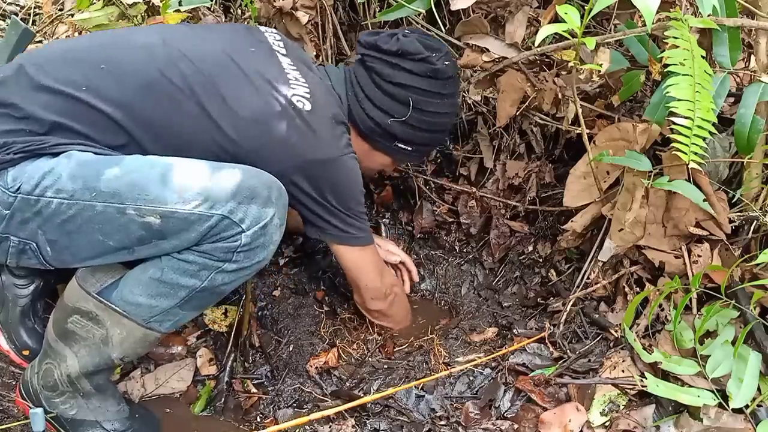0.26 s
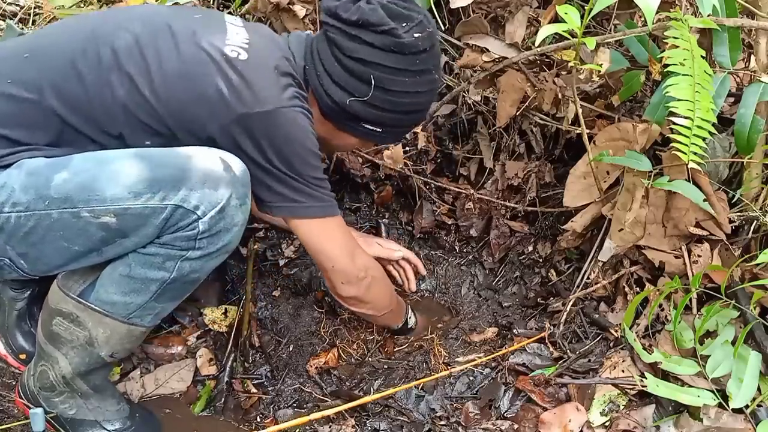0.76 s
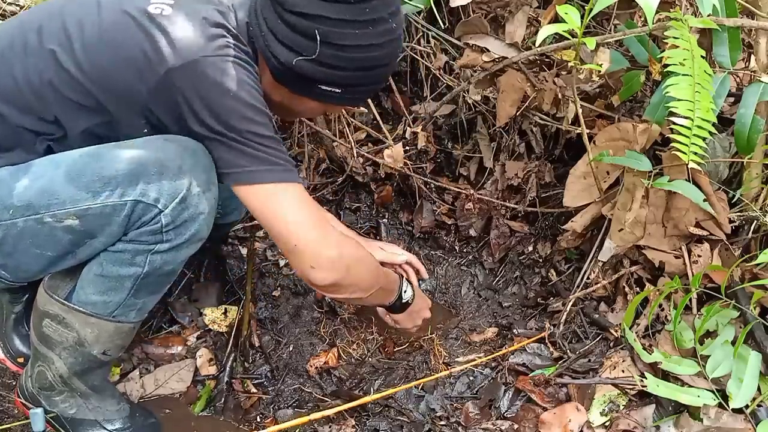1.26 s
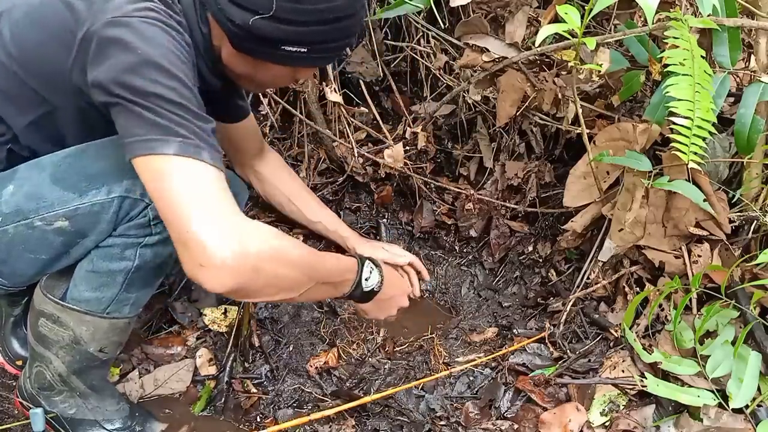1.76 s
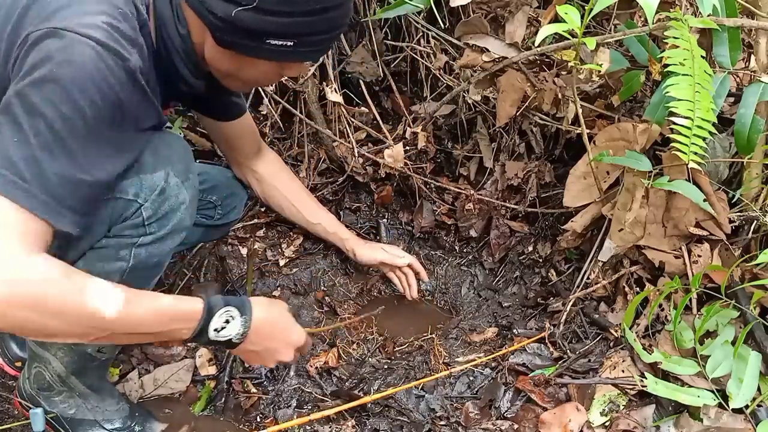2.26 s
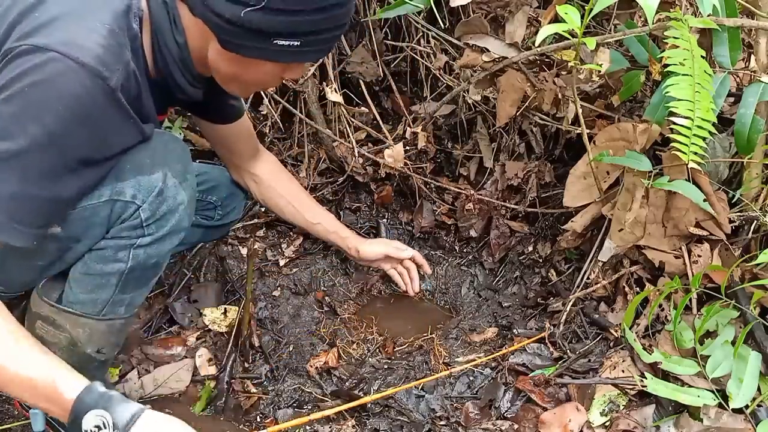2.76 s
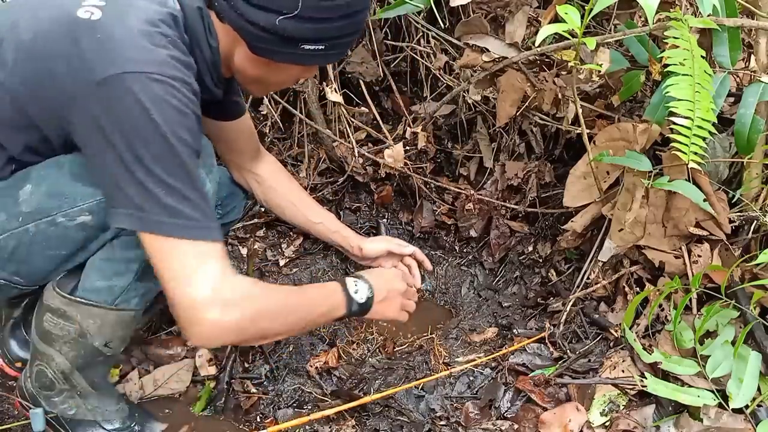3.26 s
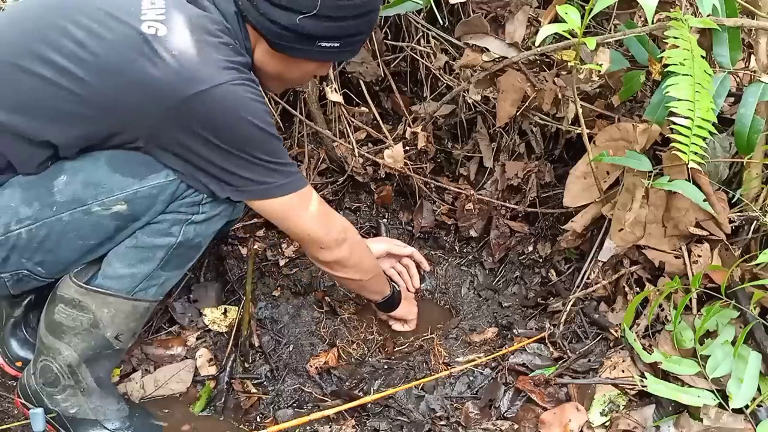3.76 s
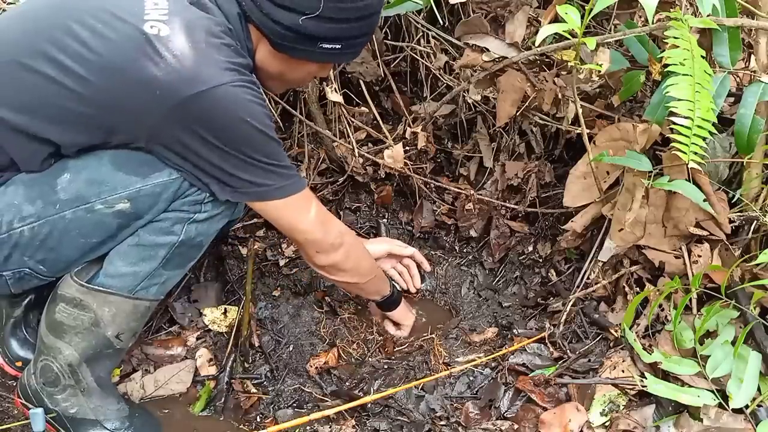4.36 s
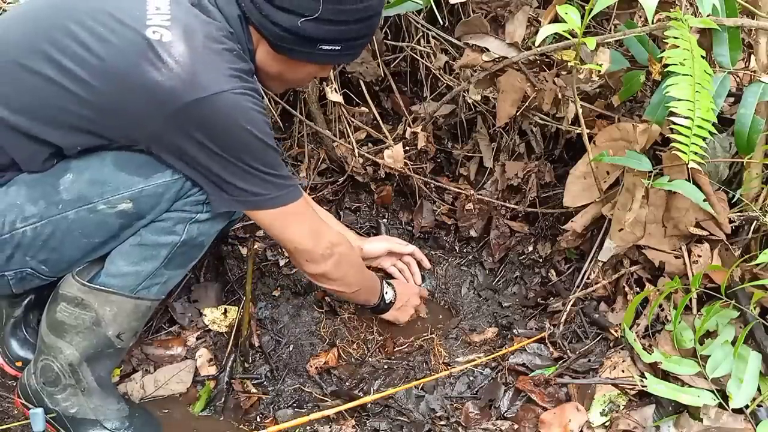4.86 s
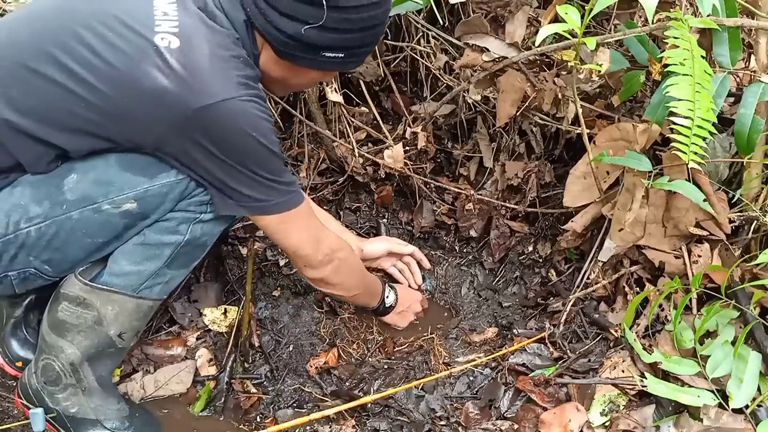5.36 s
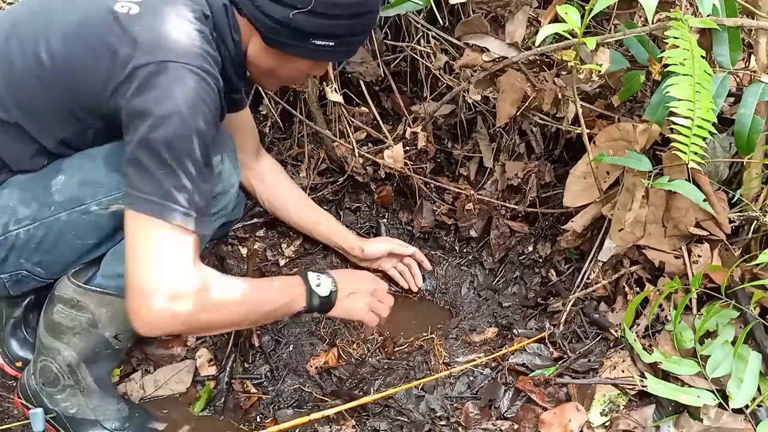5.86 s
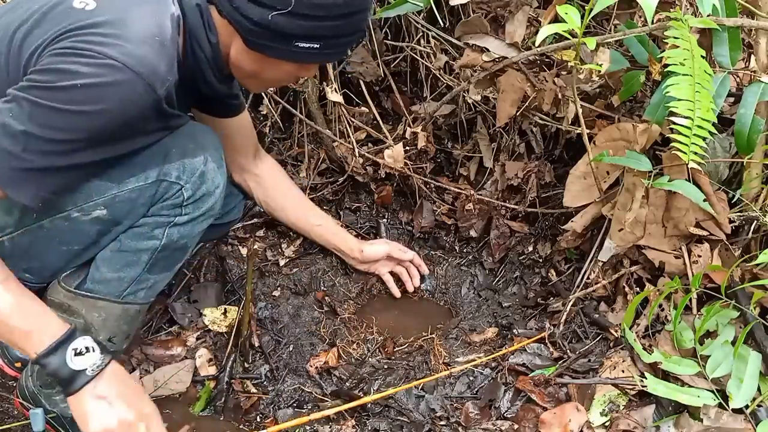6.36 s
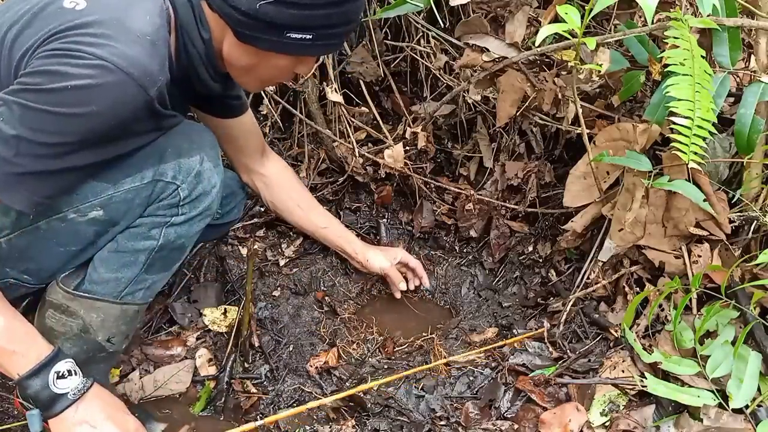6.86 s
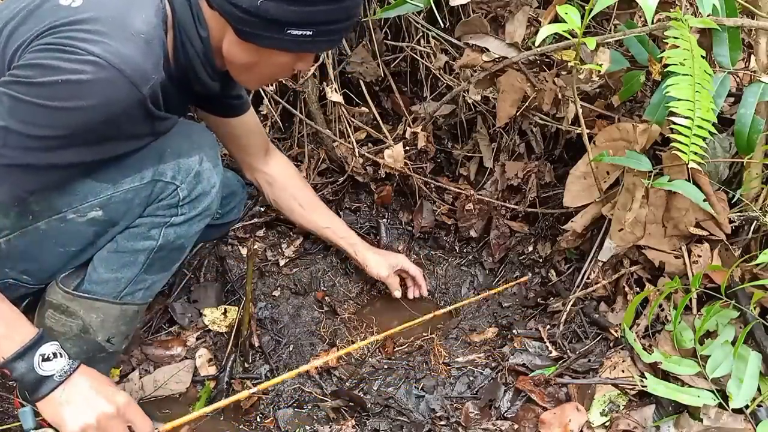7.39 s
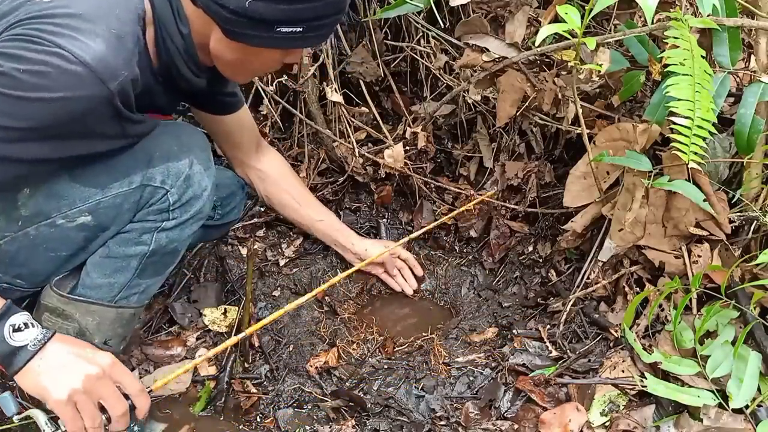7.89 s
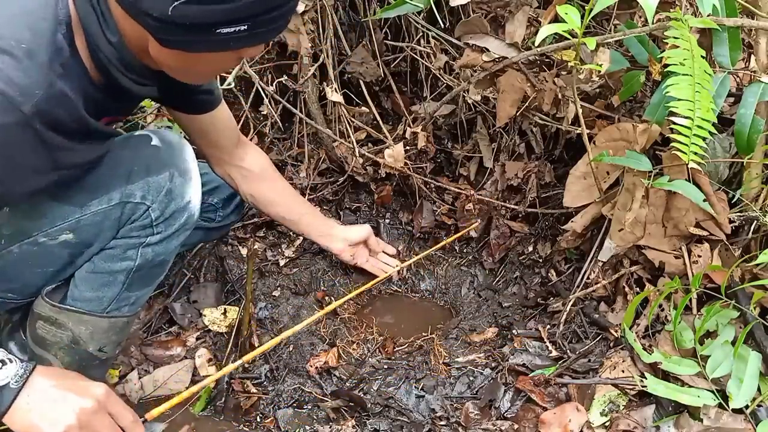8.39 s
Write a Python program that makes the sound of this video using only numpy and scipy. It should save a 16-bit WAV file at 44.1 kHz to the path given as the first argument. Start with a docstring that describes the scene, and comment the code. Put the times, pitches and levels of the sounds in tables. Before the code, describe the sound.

A steady shrill cicada drone fills a swamp forest while two sharp, wet finger flicks pop in a muddy water hole and a bird whistles.

```python
"""Heard: a cicada chorus droning through a swamp forest, two finger flicks in a muddy water hole, bird calls.
Cicadas are click trains rung by their bodies and blurred by echoes; crickets and canopy wind lie beneath.
Each flick is a slap, a few ringing air pockets and crackling spray; twigs tick and wet leaves rustle.
A bird whistles a three-note phrase twice, smeared by echoes from the trunks; a lower call hoots further off."""
import sys
import numpy as np
from scipy import signal
from scipy.fft import rfft, irfft
from scipy.io import wavfile
from scipy.ndimage import uniform_filter1d

SR = 44100
rng = np.random.default_rng(int(sys.argv[2]) if len(sys.argv) > 2 else 0)


def master_out(mix):
    """Clip the mix to full scale and print it as 16-bit PCM to the path in sys.argv[1]."""
    frames = np.transpose(np.atleast_2d(mix))
    ceiling = np.clip(frames, -1, 1)
    pcm = np.round(ceiling * 32767).astype(np.int16)
    wavfile.write(sys.argv[1], SR, pcm)


N = 380583
T = np.arange(N) / SR
BINS_HZ = np.arange(N // 2 + 1) * SR / N

# Levels in the tables are set before echo, pan and output filters.
# Insect body resonance. Each row: frequency in Hz, relative gain in dB.
CICADA_BODY = [(4500, -50), (5600, -35), (6000, -22), (6350, -10), (6650, -1.5), (6980, 1.5), (7250, -1.5),
               (7520, -13), (7850, -24.5), (8300, -31), (8880, -21), (9150, -34.5), (9600, -73.5)]
# Resonance an octave above. Each row: frequency in Hz, relative gain in dB.
CICADA_OVERTONE = [(9500, -45.5), (12300, -17.5), (13300, 7.5), (14400, 17), (15000, 8.5), (15600, 0.5)]
# Stereo lean of the cicadas. Each row: frequency in Hz, left minus right in dB.
CICADA_SIDE = [(5800, 2.5), (6600, -0.5), (7100, 4), (7400, -2.5), (9000, 1), (14000, -5.5)]
# Trills of a lone cricket. Each row: start in seconds, length in seconds, pitch in Hz, level in dB.
CRICKET_TRILLS = [(1.0, 1.9, 5200, -80), (2.88, .92, 5430, -63.5)]
# Spectrum of the canopy murmur. Each row: frequency in Hz, relative gain in dB.
FOREST_AIR = [(15, -56), (25, -20.5), (60, -5), (81, -1.5), (285, -5), (403, -6), (559, -5), (809, -6.5),
              (1120, -9), (2400, -8.5), (2730, -8.5), (4500, -25.5), (5850, -48.5), (9900, -120)]
# Likeness of the two ears. Each row: frequency in Hz, likeness from 0 to 1.
AIR_LIKENESS = [(60, 0.2), (290, 0.2), (700, 0)]
# Stereo lean of the air. Each row: frequency in Hz, left minus right in dB.
AIR_SIDE = [(100, 7.1), (380, 1.4), (1300, 1)]
# Clearer twigs, stalks and drops. Each row: start in seconds, peak in dB, ring in Hz, width in Hz,
# decay (t60) of the exciting crack in seconds.
TICKS = [(1.028, -52, 1980, 890, .035), (1.098, -52.5, 2420, 900, .05), (1.276, -50, 3000, 895, .04),
         (1.390, -53, 3460, 302, .04), (1.414, -45, 3150, 700, .03), (1.491, -49, 4320, 800, .025),
         (2.037, -47.5, 3070, 700, .024), (2.227, -52.5, 2900, 1400, .05), (2.543, -43.5, 2400, 1500, .018),
         (2.95, -52, 1820, 600, .023), (3.035, -26.5, 1620, 1200, .027), (3.07, -43, 1690, 1800, .03),
         (3.108, -32, 2220, 1800, 0.049), (3.107, -35.5, 476, 223, 0.019), (3.121, -39.5, 1100, 1500, .035),
         (3.161, -32.5, 1410, 1010, .05), (3.172, -28.5, 2400, 2800, .012),
         (3.301, -32.5, 2140, 2380, .028), (4.137, -25, 2003, 900, .014), (5.37, -49.5, 1940, 1200, .025),
         (5.469, -56, 1800, 1200, 0.022), (5.709, -51.5, 2400, 1000, .02), (6.009, -48.5, 2395, 1800, .018),
         (6.036, -51, 1480, 1500, .018), (6.438, -37.5, 1198, 1100, 0.01), (8.153, -54, 1740, 200, .1),
         (8.446, -48, 2040, 1495, .02)]
# Hands brushing leaves, mud and water. Each row: middle in seconds, length in seconds,
# level in dB before the swell, centre in Hz.
RUSTLES = [(1.404, 1, -73, 2400), (1.47, 0.28, -74.5, 650), (2.45, 0.057, -60.5, 3520),
           (2.731, 0.058, -66, 3800), (3.102, 0.12, -64, 1490), (3.78, 0.17, -68.5, 2600),
           (5.022, 0.069, -60.5, 3600), (6.072, 0.054, -80, 3210), (8.297, 0.34, -78, 2600)]
# Far, low caller. Each row: start in seconds, length in seconds, top pitch in Hz, level in dB.
HOOTS = [(2.035, 0.14, 1208, -58.5), (2.211, 0.078, 1100, -65), (2.32, 0.077, 1050, -63),
         (2.446, .06, 1130, -59.5), (2.604, 0.065, 1182, -58.5)]
# Whistled notes by name. Each row: time into the unstretched note in seconds, pitch in Hz before transposing.
NOTE_SHAPES = {"dip": [(0, 2074), (.072, 2154), (.122, 1759), (.155, 2640), (.235, 2465)],
               "step": [(0, 2660), (.032, 2510), (.085, 2450), (.112, 2780), (.2, 2770)],
               "fall": [(0, 3390), (.145, 3300), (.172, 2500), (.195, 2310), (.265, 2360)]}
# Note envelopes by name. Each entry: attack in seconds, gain from start to end in dB.
NOTE_ENVELOPES = {"dip": (0.011, 14), "step": (0.01, 5.9), "fall": (0.039, -1.2)}
# Both phrases. Each row: start in seconds, note name, time stretch, pitch factor, level in dB.
NOTES = [(2.286, "dip", 1.03, 0.99, -52.5), (2.771, "step", 1.06, 0.98, -47.5),
         (3.134, "fall", 1.0, .997, -48), (6.675, "dip", 0.91, 1.03, -53),
         (7.12, "step", .97, 1.005, -47.5), (7.45, "fall", 1.05, 1, -48)]
# Finger flicks. Each row: start in seconds, deep pocket in Hz, its level in dB, small pocket in Hz,
# its level in dB, thud in dB, fizz in dB, ring of the hole in dB, spray in dB.
FLICKS = [(4.0985, 930.3, -4, 2920, -5.5, -27.5, -24.5, -1, -17),
          (4.5294, 615.3, -1.5, 2318, -7.5, -13.5, -11, -2.5, -16)]
# Ring of the water hole. Each row: starting pitch in Hz, relative level in dB, decay (t60) in seconds.
HOLE_MODES = [(280, -30, .085), (705.8, -12, 0.022), (1360, -11.5, 0.016), (1695, -12.5, .014),
              (1989, -14.5, 0.02), (2640, -16.5, .012), (3410, -8.5, 0.018), (4300, -16, 0.019)]

DIP_S, DIP_LENGTH_S, DIP_DB = 2.268, .011, -8  # the drone dips briefly

FAINT_TICK_DB, FAINT_TICK_SCATTER_DB = -59, 2.5
FAINT_TICK_HZ, FAINT_TICK_WIDTH_HZ, FAINT_TICK_T60_S = 2250, 800, .024
FALLBACK_LAG_S, FALLBACK_S, FALLBACK_DB, FALLBACK_HZ = .042, .015, -49.5, 3245  # thrown drops land
SETTLE_LAG_S, SETTLE_S, SETTLE_DB, SETTLE_HZ = .23, .2, -71.5, 2500  # the stirred water fizzes out

HOOT_ARCH = .054  # share by which a hoot starts and ends under its pitch
HOOT_WAVER, SONG_WAVER = .028, .005  # rms share of pitch
NOTE_RELEASE_S = .014

DEEP_LAG_S, SMALL_LAG_S, SPRAY_LAG_S = .003, .0053, .0013  # after the finger meets the water
ENTRY_HZ, ENTRY_DB, ENTRY_T60_S, ENTRY_RISE = 2220, -9, .014, .6  # chirp of the finger going in
POCKET_T60_S, POCKET_RISE = .013, .027
THUD_HZ, THUD_T60_S = 403, .019  # the water pushed aside
FIZZ_HZ, FIZZ_T60_S = 6507, .014  # the tiniest bubble
SPRAY_T60_S = .043

TOP_HZ = 15500


def undb(db):
    """Decibels to gain."""
    return 10 ** (np.asarray(db) / 20)


def level(x, db):
    """Set the rms level."""
    return x * undb(db) / np.sqrt(np.mean(x ** 2))


def across(points):
    """Join (Hz, value) points over a log-frequency axis."""
    hz, value = np.transpose(points)
    return np.interp(np.log(BINS_HZ + 1), np.log(hz), value)


def colour(x, gain_db):
    """Filter by a gain for each frequency."""
    return irfft(rfft(x) * undb(gain_db), N)


def pan(left_minus_right_db):
    """Left and right offsets in dB for a level difference."""
    return np.array([[.5], [-.5]]) * left_minus_right_db


def walk(rate_hz):
    """Random levels held for 1 / rate_hz and slewed twice; rms 1."""
    hold = max(int(SR / rate_hz), 1)
    held = np.repeat(rng.standard_normal(N // hold + 1), hold)
    slewed = uniform_filter1d(uniform_filter1d(held, hold), hold)
    return level(slewed[:N], 0)


def band(x, hz, width_hz):
    """One resonance, gain 1 at its centre."""
    b, a = signal.iirpeak(hz, hz / width_hz, fs=SR)
    return signal.lfilter(b, a, x)


def soften(x, hz, kind):
    """Steep low-pass or high-pass."""
    return signal.sosfilt(signal.butter(4, hz, kind, fs=SR, output="sos"), x)


def fade(t, t60_s):
    """Exponential decay, 60 dB down at t60_s."""
    return np.exp(-np.log(1000) * t / t60_s)


def add(track, start_s, sound):
    """Mix a sound into a track at start_s."""
    i = int(start_s * SR)
    track[i:i + len(sound)] += sound[:N - i]


def trunks(x, t60_s, wet_db, gap_s=.008, uneven=3.):
    """Forest echo: scattered reflections of uneven strength, different at each ear."""
    t = T[:SR]
    chance = rng.standard_normal((2, SR))
    strengths = np.sign(chance) * np.abs(chance) ** uneven
    echoes = strengths * fade(t, t60_s) * (1 - np.exp(-(t / gap_s) ** 2))
    echoes /= np.sqrt(np.sum(echoes ** 2, axis=1, keepdims=True))
    # circular: the tail wraps round, so echoes already ring at the start
    return undb(wet_db) * irfft(rfft(x) * rfft(echoes, N), N)


def tymbals(rate_hz, jitter=.03):
    """One cicada: a click each time its ribs buckle, at a slightly unsteady rate."""
    turns = np.cumsum(rate_hz * (1 + jitter * walk(30))) / SR
    return np.diff(np.floor(turns), prepend=0)


def cicadas(count=6, body_db=-36.5, overtone_db=-65, throb_db=.65):
    """Many click trains blur among the trees; the insects' bodies ring near 7 kHz and an octave above."""
    clicks = sum(trunks(tymbals(rate_hz), .78, 0) for rate_hz in rng.uniform(120, 380, count))
    clicks = clicks * undb(throb_db * np.array([walk(22), walk(22)]))
    side_db = pan(across(CICADA_SIDE))
    outside_body = (BINS_HZ < 4000) | (BINS_HZ > 10000)
    body = colour(clicks, across(CICADA_BODY) + side_db - 60 * outside_body)
    overtone = colour(clicks, across(CICADA_OVERTONE) + side_db - 60 * (BINS_HZ < 9500))
    return level(body, body_db) + level(overtone, overtone_db)


def whistle(shape, db, waver, attack_s=.015, swell_db=0):
    """A slightly unsteady tone gliding through (s, Hz) points: attack, steady or sloping hold, release."""
    s, hz = np.transpose(shape)
    t = np.arange(0, s[-1], 1 / SR)
    unsteady = level(uniform_filter1d(rng.standard_normal(len(t)), size=400), 0)
    pitch_hz = np.interp(t, s, hz) * (1 + waver * unsteady)
    tone = np.sin(2 * np.pi * np.cumsum(pitch_hz) / SR)
    ends = np.clip(np.minimum(t / attack_s, (s[-1] - t) / NOTE_RELEASE_S), 0, 1)
    return level(tone * undb(swell_db * t / s[-1]), db) * ends


def crickets(chirp_rate_hz=27, depth=.6, waver=.0089, shrill_hz=7238, shrill_db=-55):
    """One cricket pulses its tone in trills below the cicadas; another holds a thin line on the right."""
    trill = np.zeros(N)
    for start_s, length_s, hz, db in CRICKET_TRILLS:
        add(trill, start_s, whistle([(0, hz), (length_s, hz)], db, waver))
    trill *= 1 + depth * np.sin(2 * np.pi * chirp_rate_hz * T)
    shrill = np.sin(2 * np.pi * np.cumsum(shrill_hz + 16 * walk(60)) / SR)
    placed_shrill = level(shrill, shrill_db) * undb(pan(-6))
    return undb(-10.5) * trill + trunks(trill, .4, -1) + placed_shrill


def forest_air(db=-67.5, flicker_db=-.46):
    """Soft far murmur of wind in the canopy: coloured noise, wide and a little to the left."""
    likeness = np.clip(across(AIR_LIKENESS), 0, .95)
    mid, side = rfft(rng.standard_normal((2, N)))
    shared = mid * np.sqrt(1 + likeness)
    opposed = np.array([[1], [-1]]) * side * np.sqrt(1 - likeness)
    ears = irfft(shared + opposed, N)
    air = colour(ears, across(FOREST_AIR) + pan(across(AIR_SIDE)))
    return level(air * undb(flicker_db * walk(3.3)), db)


def tick(db, hz, width_hz, t60_s, thud_db=-7):
    """One crack rings a twig; the soft ground answers low."""
    t = T[:SR // 4]
    crack = rng.standard_normal(len(t)) ** 3 * fade(t, t60_s)
    ring = band(band(crack, hz, width_hz), hz, .94 * width_hz)
    ring += undb(thud_db) * band(band(ring, 480, 700), 600, 900)
    return undb(db) * ring / np.abs(ring).max()


def twigs(count=14, scatter_octaves=.22, top_hz=6500):
    """Single twigs and stalks tick, with fainter ones scattered at random between them."""
    out = np.zeros(N)
    for start_s, db, hz, width_hz, t60_s in TICKS:
        add(out, start_s, tick(db, hz, width_hz, t60_s))
    starts_s = rng.uniform(0, T[-1], count)
    for start_s, (size, pitch) in zip(starts_s, rng.standard_normal((count, 2))):
        db = FAINT_TICK_DB + FAINT_TICK_SCATTER_DB * size
        hz = FAINT_TICK_HZ * 2 ** (scatter_octaves * pitch)
        add(out, start_s, tick(db, hz, FAINT_TICK_WIDTH_HZ, FAINT_TICK_T60_S))
    return soften(out, top_hz, "low")


def rustles(crackle_db=2.06, width_share=1.0, top_hz=7000):
    """Crowds of tiny cracks swell and fade: brushing hands, and drops landing and settling after each flick."""
    sizes = undb(crackle_db * np.minimum(rng.exponential(size=N), 5))
    cracks = rng.standard_normal(N) * (rng.random(N) < .05) * sizes

    def crowd(middle_s, length_s, db, hz):
        """One swell of cracks around middle_s."""
        width_hz = width_share * hz
        swell = np.exp(-2 * ((T - middle_s) / length_s) ** 2)
        return level(band(band(cracks, hz, width_hz), hz, width_hz), db) * swell

    out = sum(crowd(*brush) for brush in RUSTLES)
    for start_s, *_ in FLICKS:
        out += crowd(start_s + FALLBACK_LAG_S, FALLBACK_S, FALLBACK_DB, FALLBACK_HZ)
        out += crowd(start_s + SETTLE_LAG_S, SETTLE_S, SETTLE_DB, SETTLE_HZ)
    return soften(out, top_hz, "low")  # damp litter has little treble


def litter():
    """Small noises on the ground, close by and a little to the left, with echo."""
    near = twigs() + rustles()
    return near * undb(pan(1.5)) + trunks(near, .22, -7.5)


def hoots():
    """A run of short, hoarse notes, each arching up to its pitch and down again."""
    voice = np.zeros(N)
    for start_s, length_s, hz, db in HOOTS:
        low_hz = hz * (1 - HOOT_ARCH)
        arch = [(0, low_hz), (length_s / 2, hz), (length_s, low_hz)]
        add(voice, start_s, whistle(arch, db, HOOT_WAVER))
    return voice


def song():
    """The same three slurred notes each time, at slightly different speed and pitch."""
    voice = np.zeros(N)
    for start_s, note, stretch, pitch, db in NOTES:
        shape = np.array(NOTE_SHAPES[note]) * [stretch, pitch]
        add(voice, start_s, whistle(shape, db, SONG_WAVER, *NOTE_ENVELOPES[note]))
    return voice


def bird(voice, direct_db, echo_db, t60_s, pan_db):
    """A call heard mostly by way of the trunks, whose echoes smear it."""
    echo = trunks(voice, t60_s, echo_db, gap_s=.0035, uneven=2.54)
    return (undb(direct_db) * voice + echo) * undb(pan(pan_db))


def pocket(hz, db, t60_s, rise, swell_s=.00041):
    """Trapped air rings, its pitch rising by a share as it fades."""
    t = T[:SR // 4]
    pitch_hz = hz * (1 + rise * (1 - fade(t, t60_s)))
    tone = np.sin(2 * np.pi * np.cumsum(pitch_hz) / SR)
    return undb(db) * tone * fade(t, t60_s) * (1 - np.exp(-t / swell_s))


def mud_bounce(x, left_s=.00044, right_s=.00037, share=.43):
    """The wet ground mirrors a sound a moment later, hollowing it near 1.2 kHz; each ear has its own path."""
    lags_s = np.array([[left_s], [right_s]])
    return irfft(rfft(x) * (1 + share * np.exp(-2j * np.pi * BINS_HZ * lags_s)), N)


def flicks(spray_swell_s=.0007, low_hz=250, hole_rise=.015):
    """The finger chirps into the water and traps a deep and a small air pocket; the hole rings, spray crackles."""
    out, t = np.zeros(N), T[:SR // 4]
    for start_s, deep_hz, deep_db, small_hz, small_db, thud_db, fizz_db, hole_db, spray_db in FLICKS:
        deep_s, small_s = start_s + DEEP_LAG_S, start_s + SMALL_LAG_S
        add(out, start_s, pocket(ENTRY_HZ, ENTRY_DB, ENTRY_T60_S, ENTRY_RISE))
        add(out, deep_s, pocket(deep_hz, deep_db, POCKET_T60_S, POCKET_RISE))
        add(out, deep_s, pocket(THUD_HZ, thud_db, THUD_T60_S, hole_rise))
        add(out, small_s, pocket(FIZZ_HZ, fizz_db, FIZZ_T60_S, hole_rise))
        add(out, small_s, pocket(small_hz, small_db, POCKET_T60_S, POCKET_RISE))
        for hz, db, t60_s in HOLE_MODES:
            add(out, deep_s, pocket(hz, hole_db + db, t60_s, hole_rise))
        spray = rng.standard_normal(len(t)) * fade(t, SPRAY_T60_S) * (1 - np.exp(-t / spray_swell_s))
        splash = band(band(spray, 2000, 2600), 2700, 2200) + undb(-28.5) * spray
        onset_spread = np.std(splash[:SR // 200])  # first 5 ms
        add(out, start_s + SPRAY_LAG_S, undb(spray_db) * splash / onset_spread)
    out = soften(out, low_hz, "high") + undb(-20.0) * out  # so small a splash moves little bass
    scattered = band(out, 2400, 3000) + undb(-15.5) * out  # leaves send back mostly the upper middle
    direct = mud_bounce(out) * undb(pan(.99))
    return direct + trunks(scattered, .18, -17.0) + trunks(scattered, .47, -29.5)


def scene():
    """Insects and air all round, birds in the trees, hands close by."""
    dip_db = DIP_DB * np.exp(-((T - DIP_S) / DIP_LENGTH_S) ** 2)
    drone = (cicadas() + crickets()) * undb(dip_db)
    far_bird = bird(hoots(), direct_db=-7, echo_db=-2.0, t60_s=.28, pan_db=3.0)
    near_bird = bird(song(), direct_db=-7, echo_db=-1.5, t60_s=.41, pan_db=.7)
    return drone + forest_air() + litter() + far_bird + near_bird + flicks()


def record(dry):
    """The microphone clips at full scale, then a steep low-pass cuts the top."""
    clipped = np.clip(dry, -1, 1)
    return signal.sosfilt(signal.ellip(10, .2, 70, TOP_HZ, fs=SR, output="sos"), clipped)


dry = scene()
out = record(dry)
master_out(out)
```